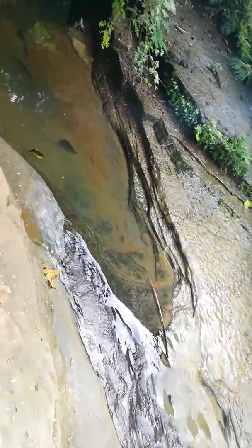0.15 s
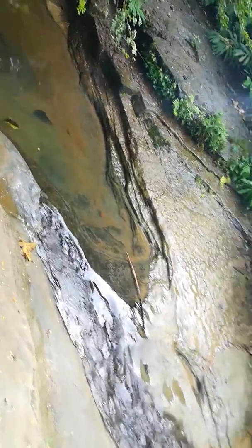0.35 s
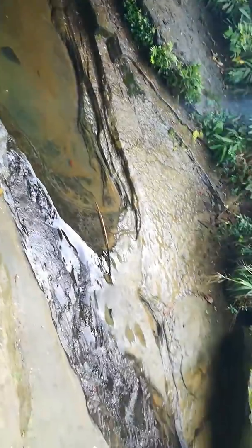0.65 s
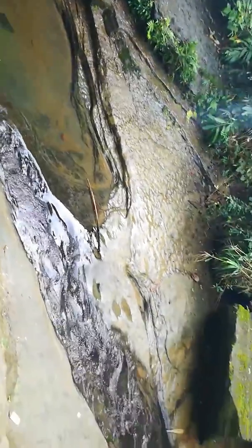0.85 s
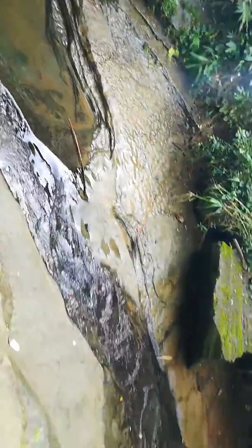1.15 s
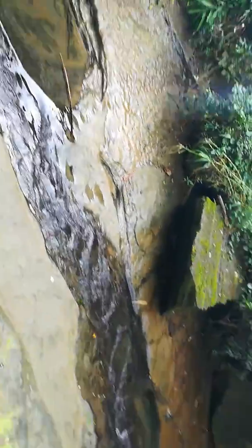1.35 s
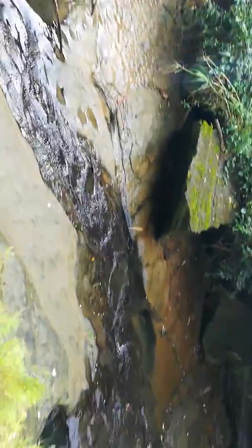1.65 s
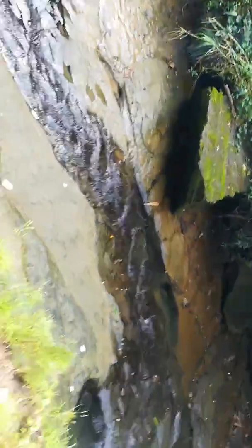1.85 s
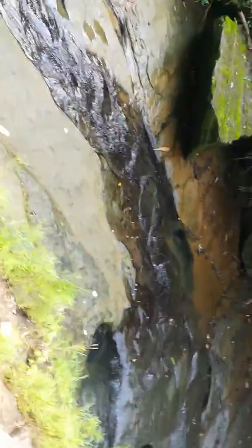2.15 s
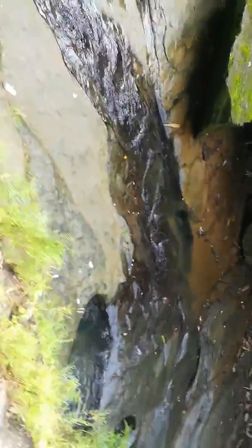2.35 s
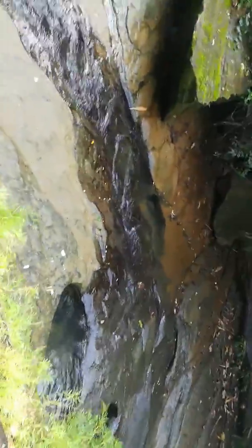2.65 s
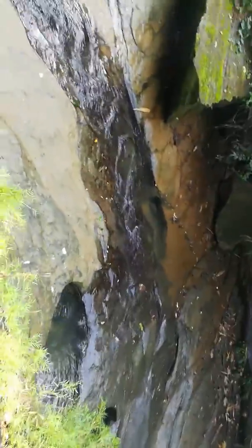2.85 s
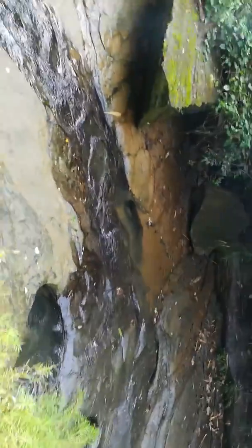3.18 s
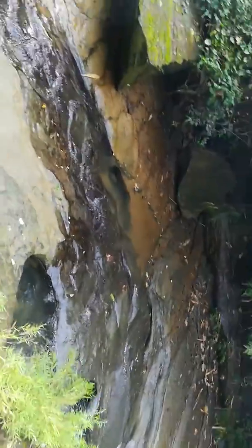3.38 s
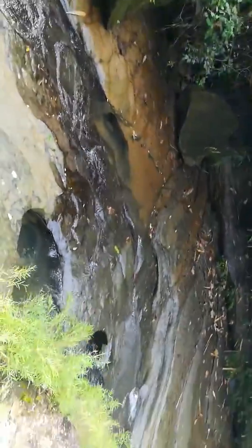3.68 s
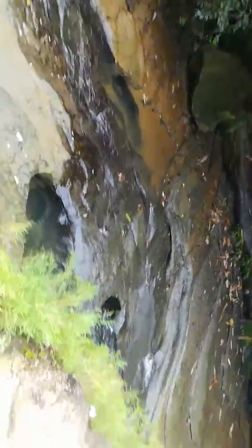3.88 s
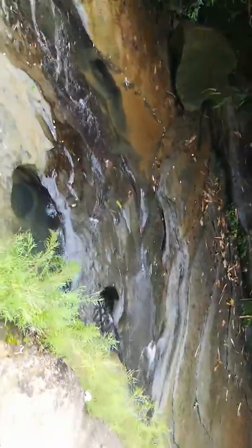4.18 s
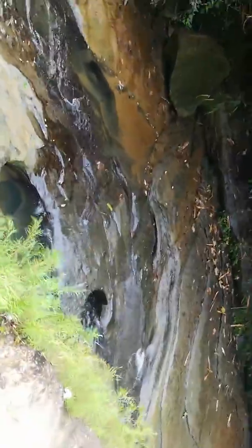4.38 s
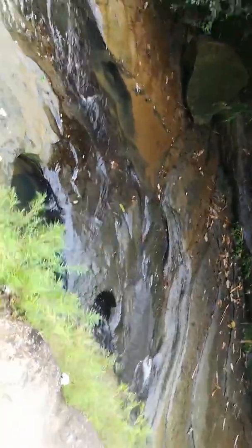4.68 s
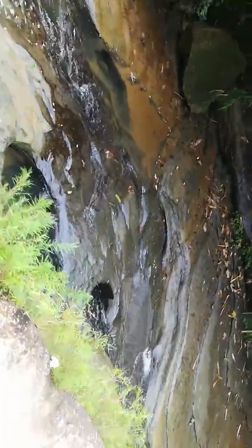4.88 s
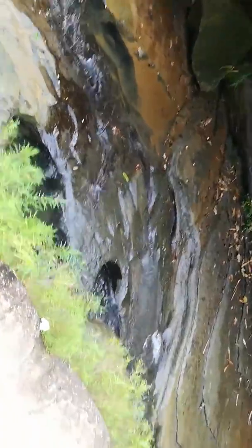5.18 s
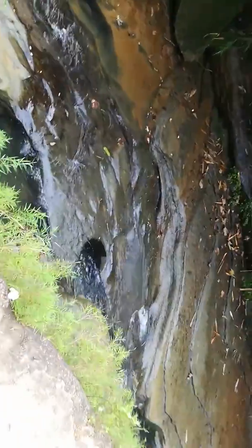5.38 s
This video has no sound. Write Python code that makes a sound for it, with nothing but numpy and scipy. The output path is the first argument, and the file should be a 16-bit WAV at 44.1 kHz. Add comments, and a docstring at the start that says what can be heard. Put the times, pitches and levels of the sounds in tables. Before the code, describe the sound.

A stream cascades over rock in a gorge, picked up by a handheld stereo microphone that turns along it. From 0 to 1.3 s the water is weak and thinning, with a deeper gush on the right arriving slightly late on the left, a low roar, air buffeting and an unsteady low drone, perhaps a distant engine, near 50 Hz. Around 1.3 s the rush jumps much louder and keeps growing slowly to the end at 5.5 s. The drone climbs slightly and stops by 3.1 s; the side fall fades by 2.8 s. Single bubbles plop from 1.8 s, more often later. From 2.6 s tiny sharp drops snap on the right, clustered near 3 s and 3.5 to 3.9 s. Spray is brightest on the right around 3 to 3.5 s; the left is duller, gushing and fizzing. Low wind gusts thump both sides, strongest near 4.85 s.

```python
"""A stream cascades over rock in a gorge while a hand-held camera turns along it.
At first the rush is weak, with a deeper fall on the right and a low drone, perhaps a far engine, that rises
in pitch. From about 1.3 s the rush is far stronger; the side fall fades by 2.8 s and the drone ends by 3.1 s.
Single bubbles plop from 1.8 s and drops snap near the right port from 2.6 s. All along, bubbles gush and foam
fizzes as tiny rings mixed with noise, spray crackles on the right, and a roar and air gusts reach both ports."""
import sys
import numpy as np
from scipy import signal
from scipy.fft import rfft, irfft, next_fast_len
from scipy.io import wavfile
from scipy.ndimage import uniform_filter1d, map_coordinates

SR = 44100
rng = np.random.default_rng(int(sys.argv[2]) if len(sys.argv) > 2 else 0)


def waveform_to_disk(signal):
    """Save audio, clipped to [-1, 1], as 16-bit WAV at the path in sys.argv[1]."""
    frames = np.transpose(np.atleast_2d(signal))
    scaled = np.clip(frames, -1, 1) * 32767
    samples = np.round(scaled).astype(np.int16)
    wavfile.write(sys.argv[1], SR, samples)


N = 243873

# The stream as the camera turns along it.
# Each row: time in seconds, level of the rush in dB, level of the spray over the rush in dB.
STREAM = [(0, -57.5, 0.5), (.3, -62, 4.5), (.45, -65.5, 4.5), (.6, -65, 0.5), (.85, -65, -1.5),
          (1.0, -64.5, 1), (1.14, -65.5, 1), (1.32, -53, -4.5), (1.5, -50.5, -3.5), (1.6, -52, -3.5),
          (1.7, -49, -4.5), (2.1, -47.5, -2), (2.3, -49.5, 0.5), (2.36, -48, 4), (2.43, -48, 1),
          (2.5, -48, -3.5), (2.72, -47, -1), (2.86, -48, 1), (2.93, -49, 7), (3.4, -48.5, 7.5),
          (3.7, -45.5, 3), (4.4, -45, -1.5), (4.95, -44.5, 1), (5.53, -43, -2)]
# How the two microphone ports face the water. Each row: time in seconds, right port from hollow to open (0-1),
# right port facing the spray (0-1), left port turned to the foam (0-1).
FACING = [(0, .24, .65, 0.37), (1.2, .3, .75, 0.34), (1.3, .3, 0.99, 0), (1.55, 0, 0.8, 0.1),
          (1.68, 0.2, .9, 0.87), (2.43, 0.35, 0.71, 0.91), (2.5, 0.23, 0.42, 0.7), (2.85, 0.6, .46, 0.5),
          (2.95, 0.8, 0.9, 0.94), (3.8, 0.46, 0.6, 0.5), (3.95, 0.58, 0.27, 0.84), (5.53, .65, .2, 0.66)]
# What each port catches. Each row: time in seconds, then levels over the rush in dB: left fizz,
# right gush, right fizz.
PORTS = [(0, 2.5, 6, 1), (.3, 1.5, 7, 6), (.6, 2, 9.5, 3), (.65, 0.5, 1, -1), (1.3, 1, 1.5, 1),
         (1.42, -2.5, 2.5, -4.5), (1.6, 3.5, 0, -6.5), (1.9, 2.5, -2.5, -6), (2.3, 3.5, 0, -7),
         (2.5, 2.5, -1, -3.5), (3.2, 5, 0, -2), (3.6, 2, -0.5, 0.5), (3.85, 1.5, 0, -2.5),
         (4.1, 1, 0, -1.5), (4.95, 1.5, -1, -1), (5.3, 1, -1, -3.5)]


def amp(db):
    """Turns decibels into a gain."""
    return 10 ** (np.asarray(db) / 20)


def unit(x):
    """Scales a sound to an average (rms) strength of 1."""
    return x / np.sqrt(np.mean(x ** 2) + 1e-20)


def along(points, hz):
    """Reads a curve of (Hz, value) points on a log frequency axis."""
    point_hz, value = np.transpose(points)
    return np.interp(np.log(hz + 1), np.log(point_hz + 1), value)


def curves(rows):
    """Gives one value per sample for each column after the time."""
    seconds, *columns = np.transpose(rows)
    return [np.interp(np.arange(N) / SR, seconds, column) for column in columns]


def wobble(rate):
    """A smooth random curve through `rate` random points a second."""
    knots = rng.standard_normal(int(N * rate / SR) + 4)
    return map_coordinates(knots, [np.arange(N) * rate / SR])


def filtered(x, response):
    """Multiplies each frequency of x by a response; spare room at the end limits wrap-around."""
    size = next_fast_len(N + 8192)
    gain = response(np.fft.rfftfreq(size, 1 / SR))
    return irfft(rfft(x, size) * gain, size)[..., :N]


def coloured(x, spectrum):
    """Shapes x by a spectrum that falls to silence an octave beyond each end, at rms 1."""
    closed = [(spectrum[0][0] / 2, -120), *spectrum, (spectrum[-1][0] * 2, -120)]
    return unit(filtered(x, lambda hz: amp(along(closed, hz))))


def blend(x, first, second, share):
    """Moves one sound between two colours as share goes from 0 to 1."""
    share = np.clip(share, 0, 1)
    return (1 - share) * coloured(x, first) + share * coloured(x, second)


def gusts():
    """Level in dB of the air on the ports: each gust rises fast and falls slower, 10 dB in its length."""
    # Each row: time of the peak in seconds, peak level in dB, length in seconds.
    gust_rows = [(0.0, -45.5, .25), (1.2, -45, 0.13), (1.657, -50, 0.11), (1.92, -56, .2),
                 (2.28, -52, 0.11), (2.75, -60, 0.27), (3.2, -52, .25), (3.816, -53, .4), (4.19, -49, 0.43),
                 (4.85, -40, .2), (5.067, -44.5, .2), (5.36, -46.5, 0.22)]
    calm_db, rise_share = -63, 0.4  # air between gusts; time to rise 10 dB as a share of the length
    t = np.arange(N) / SR
    swells = [peak_db - 10 * np.maximum(t - s, (s - t) / rise_share) / length
              for s, peak_db, length in gust_rows]
    return np.maximum(calm_db, np.max(swells, axis=0))


def low_end():
    """Gusts, a thrum and the roar of the fall: shaped noise, nearly the same at both ports when lowest."""
    # Spectra of the three layers. Each row: frequency in Hz, relative level in dB per Hz.
    gust_colour = [(15, -28), (25, -3.5), (40, -2), (55, -8), (70, -14)]
    thrum_colour = [(45, -31), (62, -5.5), (85, 4.5), (110, 2), (140, 0.5), (180, -42)]
    roar_colour = [(90, -2), (140, -5), (200, 3), (300, -3), (400, -9), (500, -24), (650, -73)]
    # Each row: time in seconds, level of the roar over the rush in dB.
    roar_rows = [(0, 2.5), (.5, 10), (.8, 0), (1.1, -0.5), (1.25, 2), (1.66, -4), (1.75, -1.5), (2.2, -0.5),
                 (2.3, -2), (3.05, -1.5), (3.2, 3), (3.5, -1), (3.8, -0.5), (5.3, -3.5), (5.53, -1)]
    # Each row: time in seconds, level of the thrum over the roar in dB.
    thrum_rows = [(0, 4), (.25, 5), (.7, -0.5), (1.1, -1.5), (1.45, -0.5), (1.75, -6), (1.92, -1),
                  (2.43, -18), (2.6, -1.5), (3.15, -23), (3.5, -5.5), (4.7, -10.5), (5.25, -1.5),
                  (5.53, -11.5)]
    # Each row: frequency in Hz, likeness of left and right (1 = the same).
    alike_rows = [(30, .999), (60, 1), (130, 0.96), (290, 0.87), (450, 0.17), (600, .1)]

    roar_db = curves(STREAM)[0] + curves(roar_rows)[0]
    thrum_db = roar_db + curves(thrum_rows)[0]
    layers = [(gusts(), gust_colour), (thrum_db, thrum_colour), (roar_db, roar_colour)]

    def mix():
        return sum(amp(db) * coloured(rng.standard_normal(N), colour) for db, colour in layers)

    def mid_side_gains(hz):
        angle = np.arccos(np.clip(along(alike_rows, hz), -1, 1)) / 2
        return np.array([np.cos(angle), np.sin(angle)])

    # The middle is common to both ports; the side is added to one and taken from the other.
    mid, side = filtered(np.array([mix(), mix()]), mid_side_gains)
    return np.array([mid + side, mid - side])


def drone():
    """Four orders (multiples) of a slightly unsteady pitch, faded out just before the last row."""
    # Each row: time in seconds, pitch in Hz, then the middle levels of orders 1 to 4 in dB.
    drone_rows = [(0, 50.1, -52, -69, -63.5, -53), (.14, 49.8, -61, -49.5, -54, -67),
                  (.29, 48.62, -49.5, -50.5, -52, -59), (.6, 50, -78, -51.5, -75, -66),
                  (1.01, 53.37, -57, -74, -83, -73.5), (1.1, 50.8, -58, -53, -70, -79),
                  (1.25, 52.3, -46.5, -63, -69, -63), (1.46, 51.7, -42.5, -53, -68, -50.5),
                  (1.63, 52.7, -46, -48, -70, -47), (1.72, 54.1, -63, -65, -70, -48),
                  (1.88, 53.93, -48, -48, -54, -54), (2.07, 54, -49, -62, -73, -55),
                  (2.18, 56.8, -53, -49.5, -63, -57), (2.42, 58.8, -70, -68, -52, -70),
                  (2.5, 58.9, -50, -59, -66, -56), (2.57, 60.06, -51, -56, -55, -75),
                  (2.79, 58.66, -68, -57, -71, -66), (2.91, 59.7, -51, -60, -59, -55),
                  (3.1, 61.05, -69, -54, -49, -65)]
    pitch_hz, *orders_db = curves(drone_rows)
    phase = 2 * np.pi * np.cumsum(pitch_hz * (1 + 0.0074 * wobble(12.68))) / SR
    fade = np.clip((drone_rows[-1][0] - np.arange(N) / SR) / 0.12, 0, 1)
    total = np.zeros(N)
    for order, db in enumerate(orders_db, start=1):
        level = np.sqrt(2) * amp(db + 1.7 * wobble(13))
        total += level * np.sin(order * phase + rng.uniform(0, 2 * np.pi))
    return fade * total


def bubbles(count, centre_hz, spread, cycles, scatter_db, rise):
    """Random bubbles: damped sines whose pitch rises as each one nears the surface; loud ones are rare."""
    draw, t = rng.random((count, 2)), np.arange(256) / SR
    hz = np.clip(centre_hz * np.exp(spread * rng.standard_normal((count, 1))), 300, 15000)
    age = t * hz / cycles  # 1 after the given number of cycles
    rarity = np.minimum(-np.log(1 - draw[:, 1:]), 5)
    level = amp(scatter_db * rarity) * np.sqrt(hz / centre_hz)
    wave = level * np.sin(2 * np.pi * hz * t * (1 + rise * age / 2))
    ring = wave * age * np.exp(-3 * age)  # soft start, then dying away
    where = (draw[:, :1] * N).astype(int) + np.arange(256)
    return unit(np.bincount(where.ravel(), ring.ravel(), N + 256)[:N])


def water(grains, share, patchy_db):
    """Grains on a wash of noise with drifting patches; share is the grains' part of the power."""
    z = signal.stft(rng.standard_normal(N), nperseg=512)[2]
    # Smoothing over neighbouring pitches, then over time, makes the patches.
    field = uniform_filter1d(rng.standard_normal(z.shape), size=4, axis=0)
    field = uniform_filter1d(field, size=14, axis=1)
    wash = unit(signal.istft(z * amp(patchy_db * unit(field)), nperseg=512)[1][:N])
    share = np.clip(share, 0, 1)
    return np.sqrt(share) * grains + np.sqrt(1 - share) * wash


def gush():
    """Large bubbles trapped under the falling sheet, in a wash of noise."""
    large = bubbles(count=7000, centre_hz=1246, spread=0.4825, cycles=9.2, scatter_db=0.5, rise=0.22)
    return water(large, share=0.25, patchy_db=2.5)


def side_fall():
    """A deeper gush that reaches the right port first and louder, the left a camera's length later."""
    # Sinks by 1.6 s, swells again towards 2.3 s, then fades by 2.8 s.
    # Each row: time in seconds, level over the rush in dB.
    level_rows = [(0, 1), (.3, 5), (.6, 0), (.66, -4), (1.15, -4.5), (1.3, -4.5), (1.6, -14), (2.3, -9),
                  (2.8, -26)]
    # Each row: frequency in Hz, relative level in dB per Hz.
    colour = [(350, -1), (480, 3.5), (620, -0.5), (850, 2), (1050, -17), (1300, -50)]
    fall = amp(curves(STREAM)[0] + curves(level_rows)[0]) * coloured(gush(), colour)
    lag = 0.00066  # s between the ports
    half_turns = np.array([[-1], [1]])  # left late, right early, by half the lag each
    return filtered(fall, lambda hz: amp([[-1.5], [1.5]]) * np.exp(1j * np.pi * hz * lag * half_turns))


def plops():
    """Single bubbles that stand out of the gush: each a soft-started ring that rises in pitch."""
    # Each row: start in seconds, peak level in dB before panning, starting pitch in Hz, left over right in dB.
    plop_rows = [(1.813, -47, 2620, -1), (2.671, -43, 1296, 3.5), (3.066, -44, 1728, 6),
                 (3.547, -45, 1370, 0), (3.979, -40.5, 2360, 4), (4.046, -43, 1410, 1.0),
                 (4.398, -51, 1160, 1), (5.115, -51, 1340, 0.5), (5.169, -42, 1320, 1.0),
                 (5.456, -38.5, 1126, -4)]
    out, t = np.zeros((2, N + 1024)), np.arange(1024) / SR
    for s, db, hz, pan_db in plop_rows:
        age = t * hz / 10  # 1 after ten cycles of the starting pitch
        swell = np.e * 3 * age * np.exp(-3 * age)
        ring = swell * np.sin(2 * np.pi * hz * t * (1 + 0.065 * age))
        out[:, round(s * SR):][:, :1024] += amp(db + np.array([[.5], [-.5]]) * pan_db) * ring
    return out[:, :N]


def snaps():
    """Drops that snap near the right port: each is a brief ring with a crack of noise."""
    # Each row: start in seconds, peak level at the right port in dB, pitch in Hz.
    snap_rows = [(2.6236, -34, 9040), (2.9365, -26, 9920), (3.0355, -29, 7820), (3.0637, -26, 8590),
                 (3.1114, -35, 6770), (3.499, -28, 11400), (3.5538, -31, 6650), (3.7264, -40, 6450),
                 (3.7519, -26, 9050), (3.839, -21, 5950), (3.847, -30, 11000), (3.923, -32, 6100),
                 (4.2744, -32, 5900), (4.971, -26.5, 6200), (5.0459, -31, 6480), (5.2874, -34, 5690),
                 (5.2994, -32, 6020)]
    t60_s, rise_s = 0.0042, 0.0007  # time to die away by 60 dB; time scale of the start
    out, t = np.zeros(N + 256), np.arange(256) / SR
    shape = amp(-60 * t / t60_s) * t ** 2 / (1 + (t / rise_s) ** 2)
    for s, db, hz in snap_rows:
        crack = 0.44 * np.diff(rng.standard_normal(258))[1:] * hz / 11000
        ring = shape * (np.sin(2 * np.pi * hz * t) + crack)
        out[round(s * SR):][:256] += amp(db) * ring / np.abs(ring).max()
    return out[:N]


def fizz():
    """Foam: small short-lived bubbles in a wash of noise."""
    small = bubbles(count=9000, centre_hz=3810, spread=0.39, cycles=3.56, scatter_db=0.5, rise=0.08)
    return water(small, share=0.12, patchy_db=2.5)


def spray(opened, faced, bursts_db):
    """Tiny high bubbles crackle in a wash of noise, in small bursts; it changes colour when faced."""
    # Spectra with the right port turned aside and facing. Each row: frequency in Hz, relative level in dB per Hz.
    aside_colour = [(4500, -26), (5800, 4), (7500, 0.5), (10800, -1.5), (12300, -3.5), (13800, -27),
                    (16000, -17)]
    faced_colour = [(4500, -8), (5800, -7), (7500, -0.5), (9000, -2), (12000, -5), (14000, -3.5),
                    (16000, -10)]
    crackle = bubbles(count=6000, centre_hz=10730, spread=0.336, cycles=5.9, scatter_db=3.0, rise=0.046)
    drops = water(crackle, share=0.27 * opened, patchy_db=1.6)
    spray_db = curves(STREAM)[1]
    return amp(spray_db + bursts_db) * blend(drops, aside_colour, faced_colour, faced)


def shared(own, common):
    """Mixes a port's own gush with the part that reaches both ports alike."""
    # Each row: frequency in Hz, shared part of the power (0-1).
    alike_rows = [(500, 0.088), (750, 0.21), (1000, 0.16), (1300, 0.22), (1700, 0.15), (2200, 0.038)]
    alike = lambda hz: np.clip(along(alike_rows, hz), 0, 1)
    own_part = filtered(own, lambda hz: np.sqrt(1 - alike(hz)))
    return own_part + filtered(common, lambda hz: np.sqrt(alike(hz)))


def left_port(common):
    """The dull port: gush, and fizz weak in the top treble; both change colour as it turns to the foam."""
    # Spectra, turned away and turned to the foam. Each row: frequency in Hz, relative level in dB per Hz.
    gush_away, gush_turned = [(380, -30), (510, -2.5), (700, -2), (940, -3), (1300, 7), (1600, 6),
                              (2200, 5), (2600, -27), (3200, -40)], [(380, -8), (510, -8), (780, -3), (940, -4),
                                                      (1250, -1.5), (1600, -3.5), (2200, -5.5), (2600, -9),
                                                      (3200, -25)]
    fizz_away, fizz_turned = [(1900, -8), (2400, -2), (3400, -2.5), (4500, -7.5), (6000, -7), (7500, -15.5),
                              (10800, -22.5), (14000, -26), (16000, -33)], [(1900, -12), (2400, -2.5), (2830, -4), (3400, -1),
                                                      (5200, 1), (6000, -3), (7500, -11.5), (10800, -22),
                                                      (12200, -35), (14000, -29), (16000, -32)]
    rush_db, turned = curves(STREAM)[0], curves(FACING)[2]
    foam = blend(fizz(), fizz_away, fizz_turned, turned)
    fizz_db = curves(PORTS)[0] + 0.41 * wobble(7.3)
    sheet = blend(shared(gush(), common), gush_away, gush_turned, turned)
    return amp(rush_db) * (sheet + amp(fizz_db) * foam)


def right_port(common):
    """The port open to the spray: gush and fizz through a hollow that opens and closes, plus spray."""
    # Spectra, hollow and open. Each row: frequency in Hz, relative level in dB per Hz.
    gush_hollow, gush_open = [(380, -12), (550, -3), (740, -5.5), (950, 4.5), (1080, 3.5), (1300, -7),
                              (1550, -3), (1900, -1), (2200, -10), (2600, -5), (3200, -40)], [(380, 8), (550, -6.5), (800, 5.5), (950, -9.5),
                                                   (1250, 5.5), (1550, -4.5), (2200, 1.5), (2600, -3),
                                                   (3200, -49)]
    fizz_hollow, fizz_open = [(1900, -25), (2400, 6), (3200, 3), (4100, 5), (5000, 3.5), (5800, 1),
                              (7000, -27)], [(1900, -19), (2400, -7), (3200, 4), (3700, -3),
                                                   (4100, -16), (5000, -2.5), (5800, -4), (7000, -34)]
    rush_db = curves(STREAM)[0]
    opened, faced, _ = curves(FACING)
    _, gush_db, fizz_db = curves(PORTS)
    bursts_db = 0.23 * wobble(11) + 0.68 * wobble(35)
    sheet = amp(gush_db) * blend(shared(gush(), common), gush_hollow, gush_open, opened)
    # The fizz follows the bursts of the spray half as strongly.
    foam = amp(fizz_db + 0.5 * bursts_db) * blend(fizz(), fizz_hollow, fizz_open, opened)
    return amp(rush_db) * (sheet + foam + spray(opened, faced, bursts_db))


def scene():
    """Adds up all sources at the two ports; the snaps are 22 dB weaker on the left."""
    common = gush()
    ports = np.array([left_port(common), right_port(common)])
    return low_end() + drone() + side_fall() + plops() + snaps() * amp([[-22], [0]]) + ports


def record(dry):
    """Each microphone adds a faint hiss; the camera keeps nothing above its band limit."""
    # Each row: frequency in Hz, relative level in dB per Hz.
    hiss_colour = [(300, -5), (1000, -17), (6000, -6), (16000, -6)]
    top_hz = 15850
    hiss = amp(-77) * np.array([coloured(rng.standard_normal(N), hiss_colour) for _ in "lr"])
    return filtered(dry + hiss, lambda hz: hz < top_hz)


dry = scene()
out = record(dry)
waveform_to_disk(out)
```